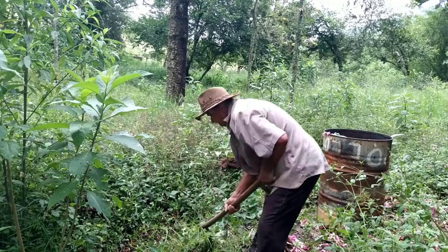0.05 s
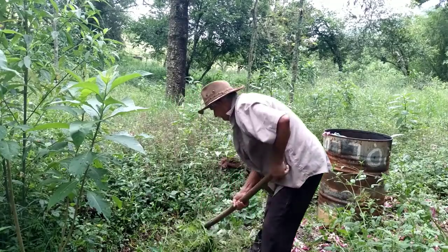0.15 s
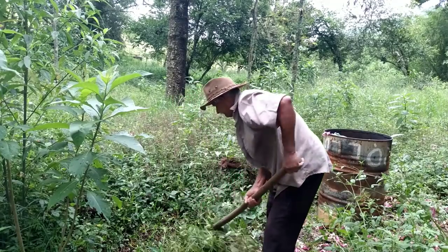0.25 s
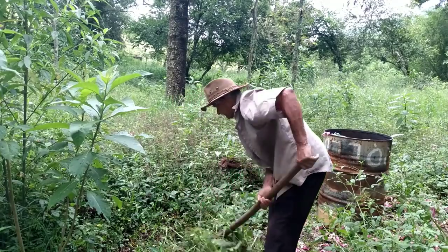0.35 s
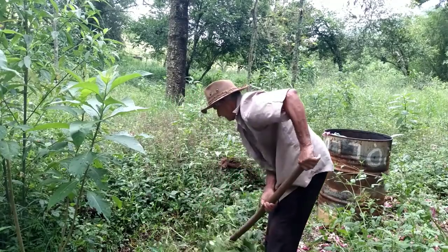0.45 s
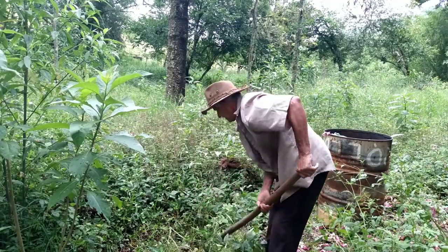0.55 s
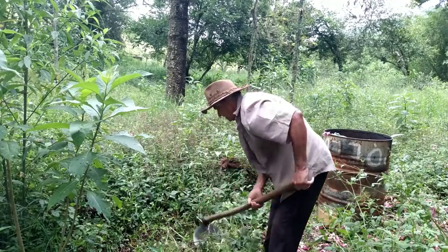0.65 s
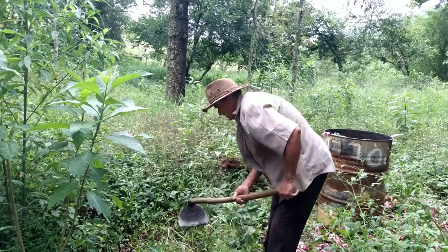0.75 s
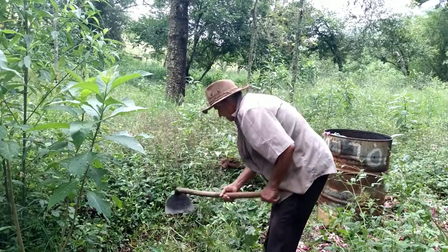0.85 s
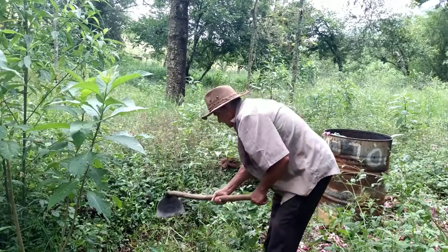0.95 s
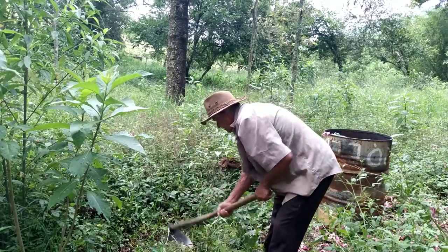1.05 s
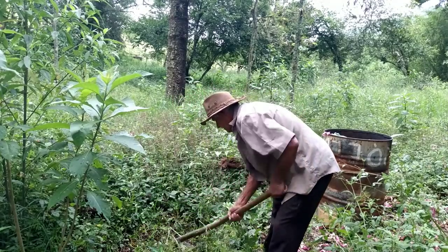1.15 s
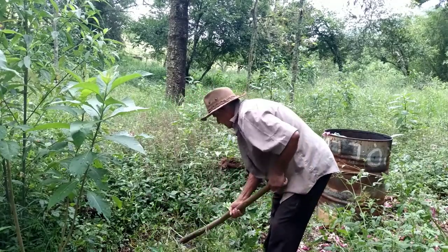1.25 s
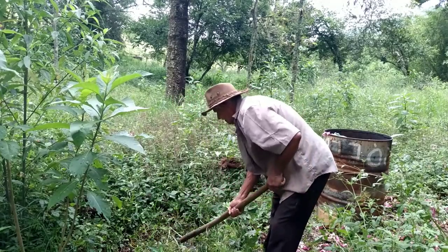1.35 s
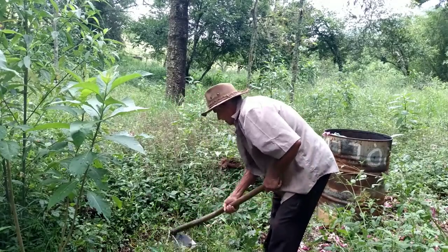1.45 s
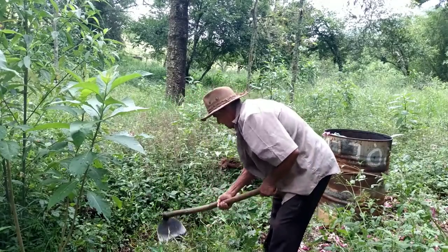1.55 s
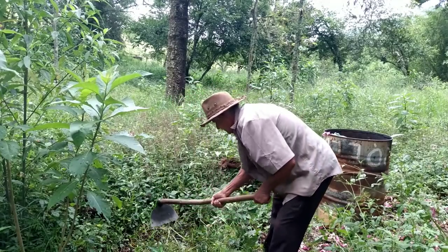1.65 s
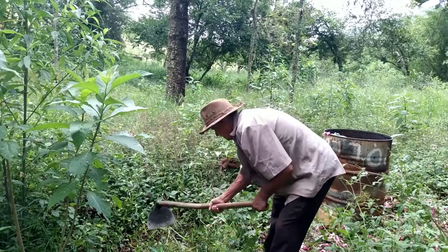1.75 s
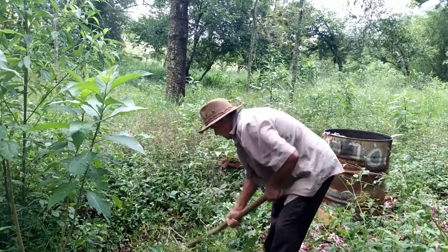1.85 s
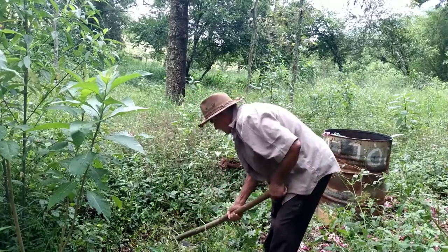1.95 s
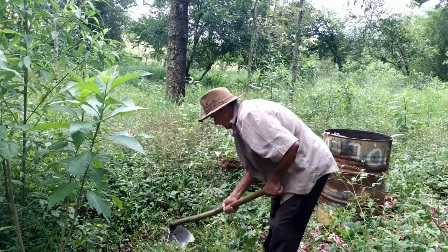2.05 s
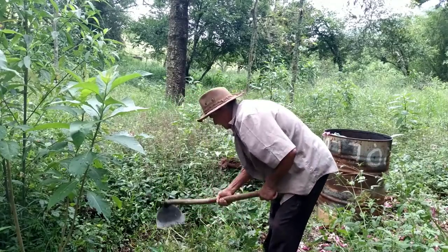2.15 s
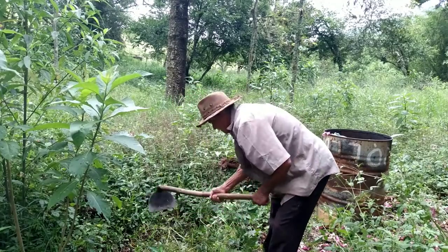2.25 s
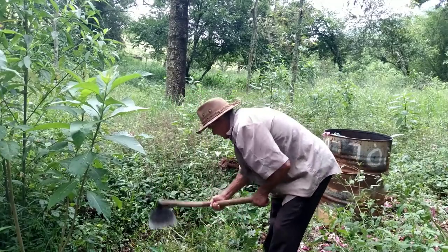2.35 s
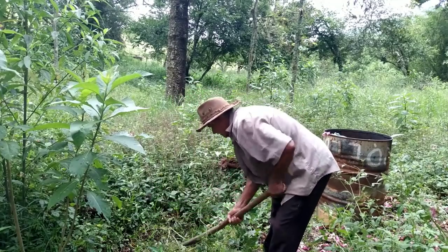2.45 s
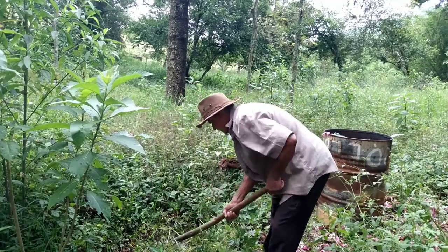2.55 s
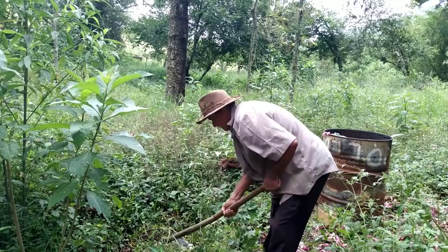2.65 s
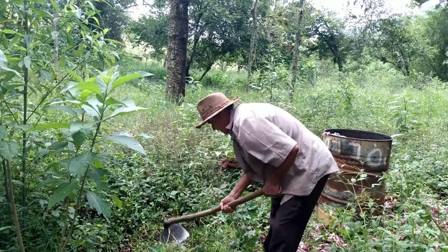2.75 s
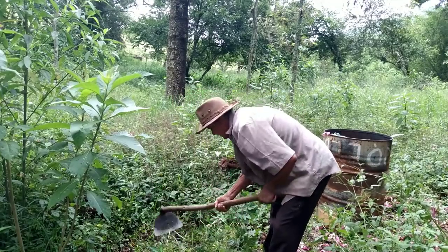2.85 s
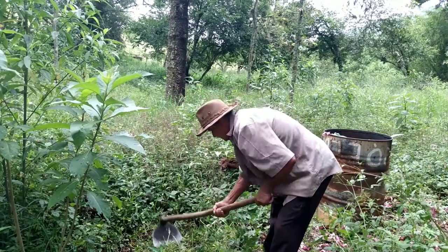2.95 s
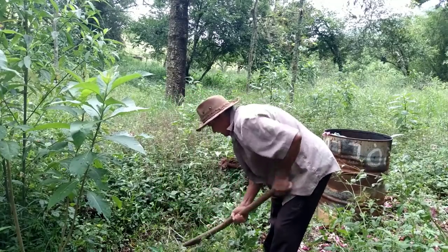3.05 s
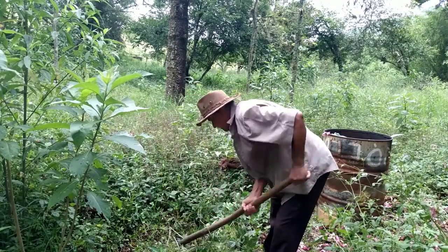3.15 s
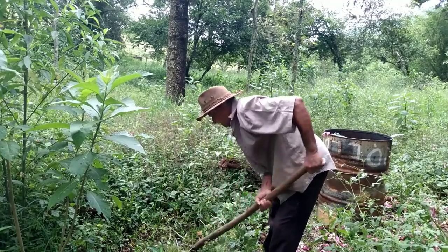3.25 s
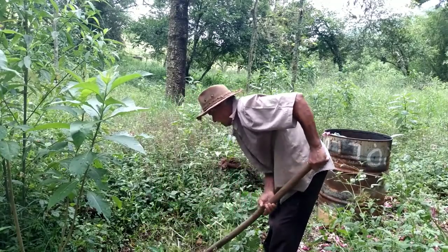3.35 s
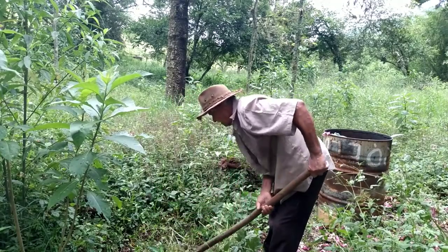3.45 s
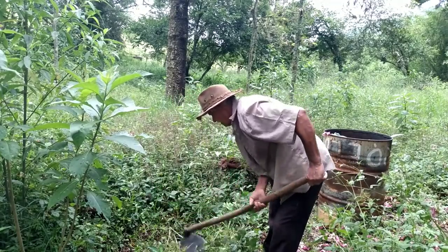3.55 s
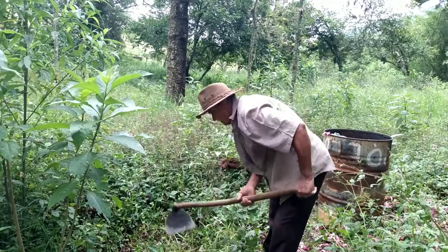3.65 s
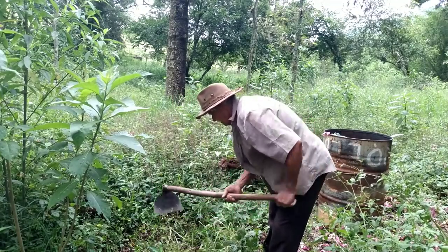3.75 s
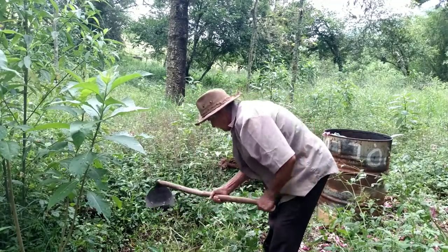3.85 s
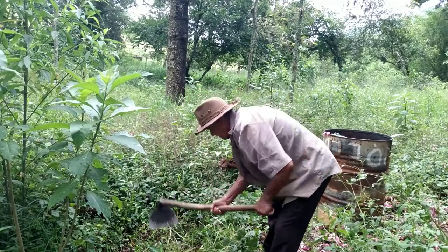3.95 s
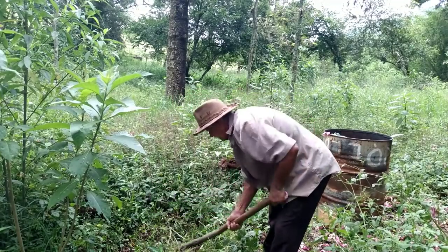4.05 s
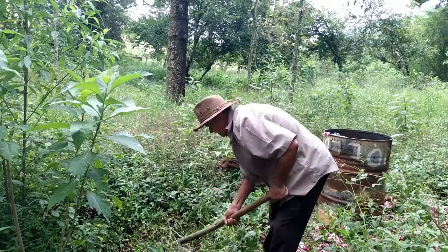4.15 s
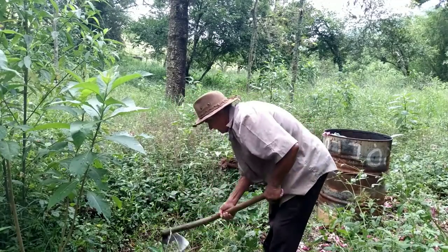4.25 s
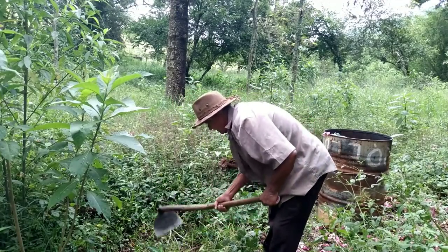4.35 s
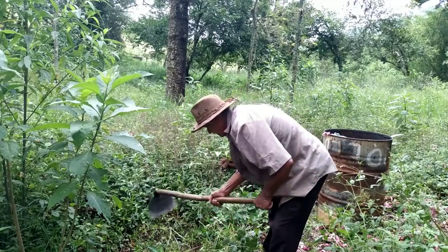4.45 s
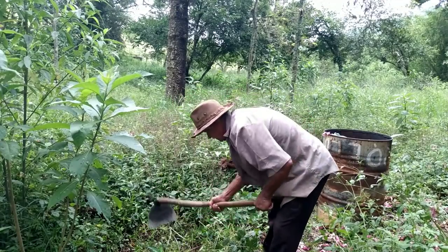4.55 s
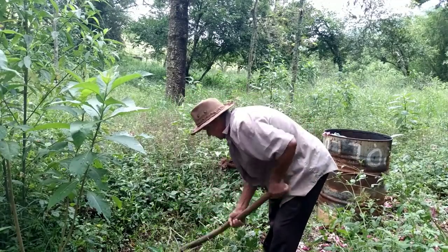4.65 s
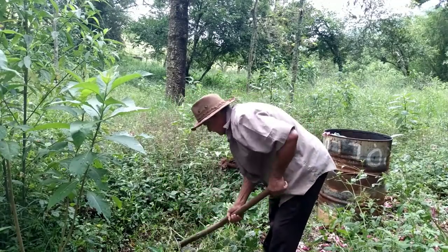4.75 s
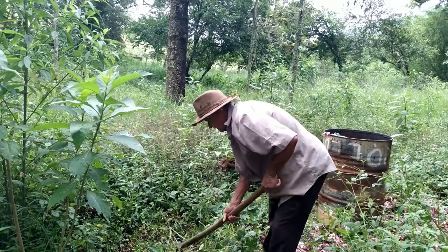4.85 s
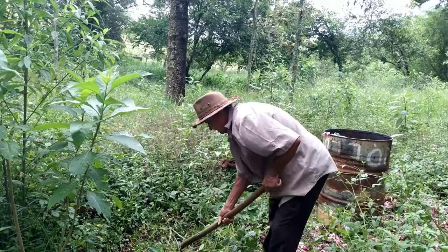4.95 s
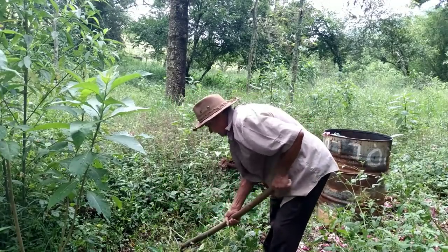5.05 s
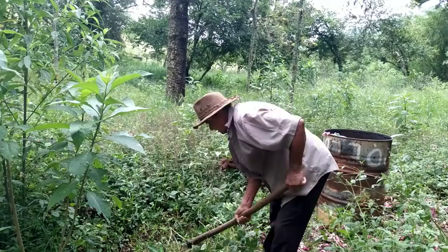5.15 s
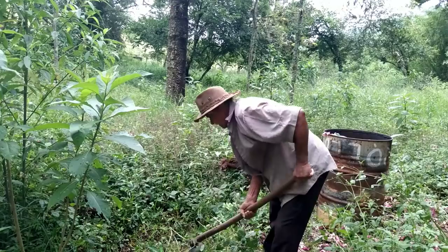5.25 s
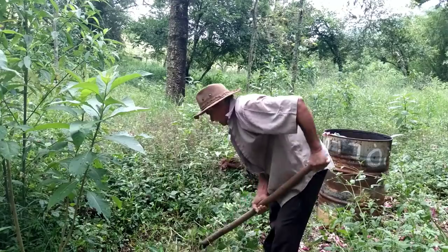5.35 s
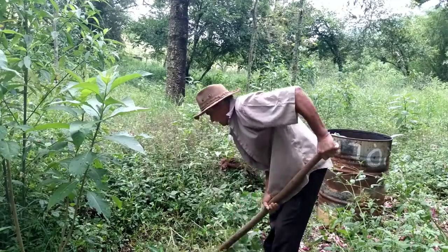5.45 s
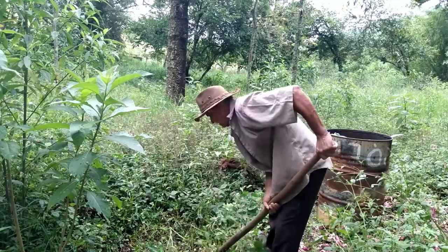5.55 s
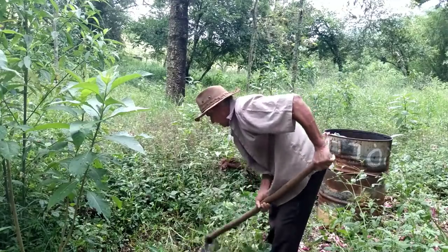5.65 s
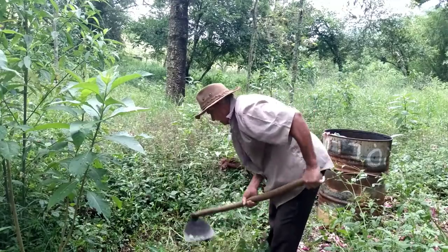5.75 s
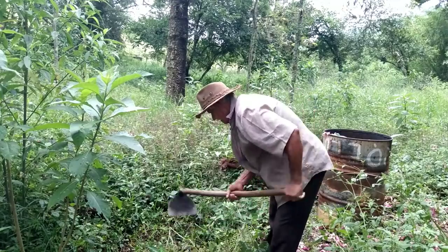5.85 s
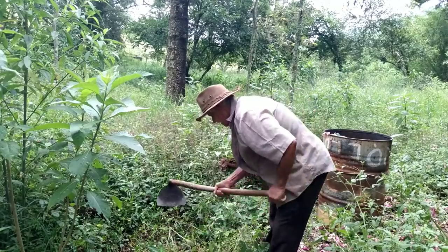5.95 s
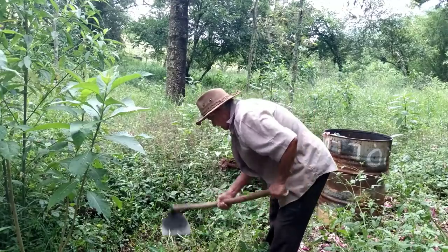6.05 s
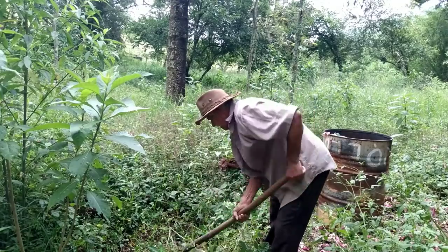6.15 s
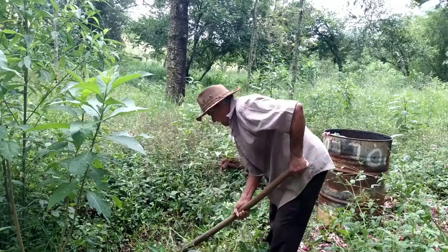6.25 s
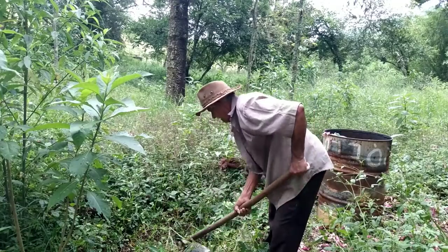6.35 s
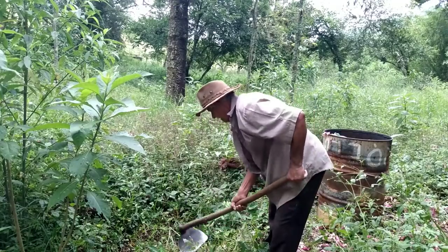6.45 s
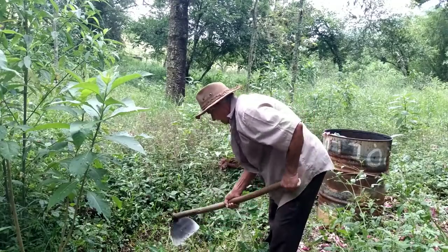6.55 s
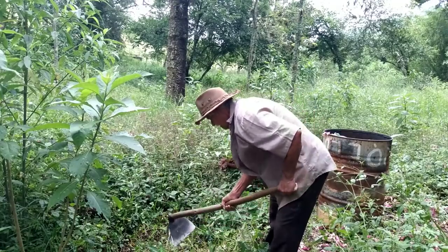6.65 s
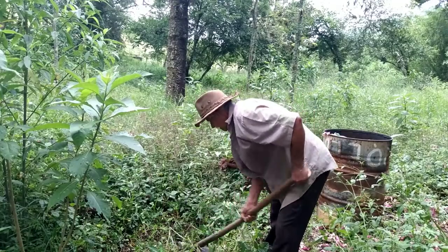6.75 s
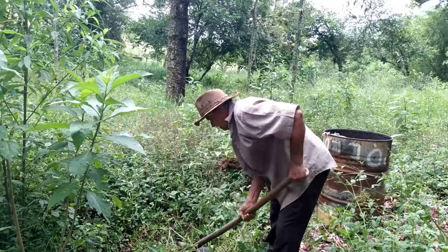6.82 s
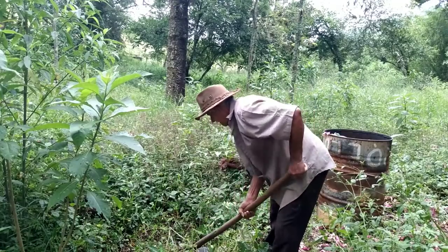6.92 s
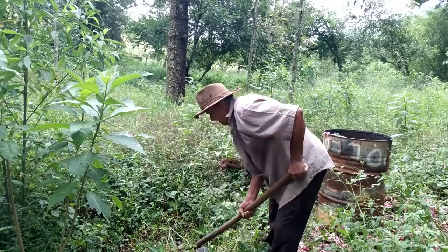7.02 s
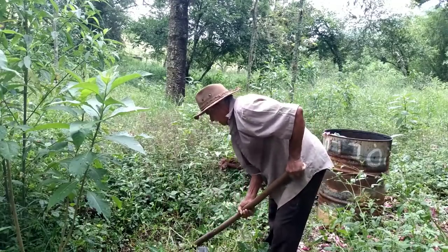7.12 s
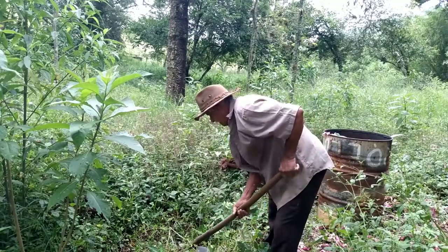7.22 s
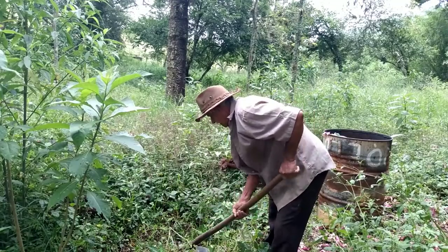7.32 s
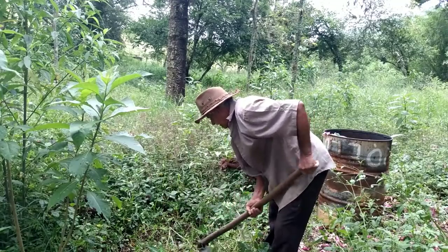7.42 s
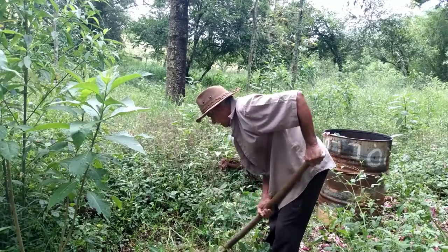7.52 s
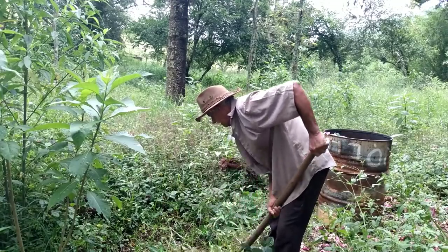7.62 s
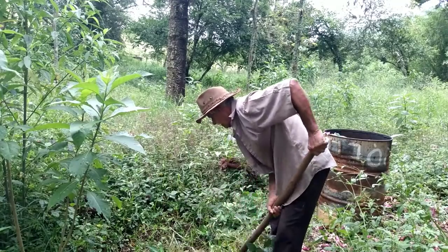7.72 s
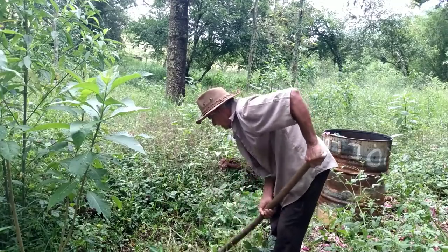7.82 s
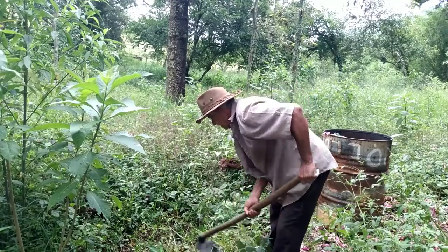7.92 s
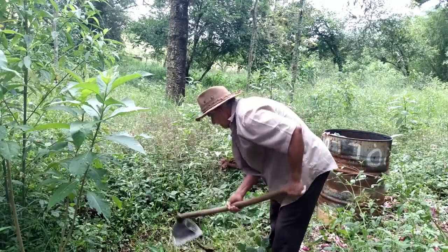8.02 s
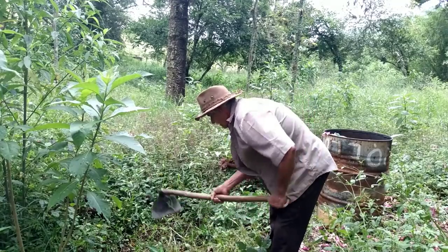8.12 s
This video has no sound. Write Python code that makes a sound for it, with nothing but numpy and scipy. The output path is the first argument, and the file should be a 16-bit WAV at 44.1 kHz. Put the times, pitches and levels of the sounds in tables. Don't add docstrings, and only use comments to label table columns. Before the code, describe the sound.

A steel hoe works weedy soil in open woodland, heard in stereo from a few metres with almost no echo. At 0 s the blade is already dragging, with rustling leaves, small snaps and gritty soil until about 0.7. A clean, clipped chop lands at 1.1, a more ringing, bouncing one at 1.9, another at 2.5, then a weak, slow one at 3.1 with snapping stems and a leafy pull. Firm chops follow at 4.1 and 4.7, the latter stopping abruptly, then crackling raking from 5.0 to 5.7. The hardest, loudest blows hit at 6.15 and 6.8, trailed by dry stalk ticks around 7. A softer scrape swells near 7.5 and fades, with light rustling to about 8.2. Throughout, insects hiss thinly in high bands above a low woodland murmur and slight wind; very faint bird whistles, some falling, some level, appear near 0.7, 1, 1.5, 2.1, 2.3, 3.6 and 5.7.

```python
import sys
import numpy as np
from scipy import signal
from scipy.fft import rfft, irfft, next_fast_len
from scipy.io import wavfile
from scipy.ndimage import uniform_filter1d, map_coordinates

SR = 44100
rng = np.random.default_rng(int(sys.argv[2]) if len(sys.argv) > 2 else 0)


def convert_level_to_amplitude(level_db):
    exponent = np.asarray(level_db, float) / 20
    return 10 ** exponent


def materialize(psi):
    bounded = np.clip(np.atleast_2d(psi).T, -1, 1)
    quanta = np.round(bounded * 32767).astype(np.int16)
    wavfile.write(sys.argv[1], SR, quanta)


N = 360738

# frequency in Hz, density in dB per Hz.
MURMUR_COLOUR = [(47, -35), (80, -6.5), (156, -9.5), (195, -7), (250, -4.5), (330, -11.5), (520, -11),
                 (700, -18.5), (990, -26.5), (2750, -22.5), (3850, -24), (4400, -18), (5720, -42.5),
                 (9680, -120)]
# frequency in Hz, density in dB per Hz.
HAZE_COLOUR = [(3650, -33), (6200, -4), (8340, -7), (9470, -13.5), (10500, -7), (11400, -11),
               (15100, -13.5), (16000, -14)]
# frequency in Hz, density in dB per Hz.
WIND_COLOUR = [(4, -1), (10, -2.5), (25, -10.5), (60, -19), (130, -28.5), (250, -50)]
# time in seconds, level in dB.
WIND_STRENGTH = [(0, -56.5), (.52, -60.5), (.93, -60), (1.5, -58.5), (1.96, -59.5), (3.6, -59), (4.76, -57),
                 (5.76, -59.5), (6.17, -60.5), (6.92, -59), (7.2, -58.5), (8.18, -60)]
# time in seconds, low kind in dB, high kind in dB.
INSECT_LEVELS = [(0, -57, -60), (1.05, -63, -55), (1.5, -60, -60), (2.85, -61, -56), (4.502, -62, -57.5),
                 (5, -58.5, -59), (6.65, -60, -59), (8.18, -60, -57)]
# centre in Hz, width in Hz.
INSECT_BANDS = [
    (4810, 400),
    (5740, 800),
]
# frequency in Hz, left-right correlation from -1 to 1.
FAR_LIKENESS = [(60, 0.83), (180, 0.21), (550, 0.68), (1650, -0.29), (4970, -0.047), (15000, -0.13)]
# frequency in Hz, left minus right in dB.
FAR_LEAN = [(60, -10), (130, 1.5), (290, 1), (640, -1), (1410, 0.5), (3100, -1.5), (6820, 8), (15000, -8.5)]
# frequency in Hz, left-right correlation from -1 to 1.
NEAR_LIKENESS = [(60, 0.36), (180, 1), (550, 0.9), (1650, 0.46), (4970, 0.74), (15000, 0.1)]
# frequency in Hz, left minus right in dB.
NEAR_LEAN = [(100, 2), (300, -1.5), (800, 1), (2000, 0.5), (3500, 3.5), (5200, 2), (7000, 19), (8300, 11.5),
             (10000, -19), (15000, -2)]
# frequency in Hz, density in dB per Hz.
SOIL_COLOUR = [(59, -35.5), (100, -8.5), (203, -1.5), (370, -6), (551, -3.5), (1300, -6.5), (1690, -43.5),
               (2860, -120)]
# frequency in Hz, density in dB per Hz.
STEM_COLOUR = [(650, -38.5), (1100, -20), (1390, -13), (1640, -5.5), (2250, -8.5), (2610, -5.5),
               (6500, -11), (8450, -43.5), (14300, -120)]
# frequency in Hz, density in dB per Hz.
LEAF_COLOUR = [(3710, -37), (6300, -7.5), (7480, 1.5), (8630, -9), (10400, -8), (12300, -15), (15100, -31),
               (16000, -33)]
# frequency in Hz, density in dB per Hz.
EDGE_COLOUR = [(880, -29.5), (1500, -4), (2360, -9), (2740, -2), (4770, -5), (7090, -10.5), (8150, -8.5),
               (15400, -37), (16000, -46.5)]
# strongest moment in seconds, level in dB,
# swelling t60 in seconds, fading t60 in seconds, leafiness in dB.
PULLS = [(.05, -46, 0.59, 2.6, -6), (.32, -41, 1.9, 0.95, 1), (.6, -52, 1.3, 0.95, -0.5),
         (1.24, -53, 0.61, 1.14, 1), (1.985, -43.5, 0.14, 0.54, -5), (2.16, -65, 1, 0.8, 2),
         (2.69, -52, 0.9, 0.43, -6.5), (3.27, -41, 1.75, 0.68, 2.5), (3.1, -43, .3, 0.5, -3),
         (3.18, -42, 1, 1.2, -2.5), (3.56, -51.5, 1.26, 0.28, 3), (4.28, -52, 1.3, 0.3, -8.5),
         (4.869, -50.5, 0.14, 0.16, -11.5), (5.107, -43, 0.059, 0.18, -12), (5.06, -48.5, 0.26, 1.7, -2),
         (5.17, -39, 0.44, 0.67, -2), (5.355, -38.5, 0.72, 1.03, 1), (5.7, -57.5, 1.1, 0.79, 2),
         (6.32, -50, 0.52, 1.08, -3), (6.56, -63.5, 1.5, 1, 1), (7.045, -55, 1.4, 0.33, 3),
         (7.227, -57, 0.66, 0.57, -6.5), (7.45, -45.5, 0.3, 1.14, -2.5), (7.6, -41, 1.98, 0.67, -0.5),
         (7.963, -48.5, 1.6, 1.05, -0.5)]
# level in dB, t60 in seconds, leafiness in dB.
SPRAYS_OF_SOIL = [(-39, 0.39, -5.5), (-32.5, 0.27, -5), (-37.5, 0.544, -3), (-38, 0.29, -5),
                  (-38, 0.6, -4.5), (-44.5, 0.69, -4.5), (-33.5, 0.47, -1.5), (-36.5, 0.47, -4)]
# start in seconds, peak in dB, pitch in Hz, low knock in relative dB.
STEM_SNAPS = [(0.018, -38, 2750, -17), (0.0532, -35, 2100, -18), (1.9518, -27, 1610, -28),
              (1.981, -26, 1610, -6), (2.5185, -24, 1620, 0), (2.693, -44, 4270, -14),
              (3.042, -38.5, 7070, -14), (3.073, -30.5, 3280, 7), (3.0911, -21, 1920, -1),
              (4.1255, -27.5, 2230, -15.5), (4.738, -30, 3640, 0), (4.8682, -42.5, 5640, -10),
              (5.1051, -24, 4850, -28), (5.139, -39.5, 2220, 7), (5.1727, -28.5, 1900, 2),
              (5.3328, -28.5, 6600, -5), (5.357, -24.5, 2200, -5), (5.4036, -27.5, 4460, -8),
              (6.1998, -31.5, 1640, -3), (6.235, -26, 1600, -4.5), (6.3459, -41, 1770, -2),
              (6.8158, -15, 4430, -41), (6.89, -35, 7070, -26.5), (6.946, -31, 7000, -8),
              (7.016, -39, 7100, -2), (7.031, -35.5, 4100, -26), (7.0366, -36.5, 4120, -3),
              (7.181, -43, 2410, -5.5), (7.234, -36.5, 2420, -29), (7.447, -30, 3240, 0),
              (5.2564, -30, 1510, -1)]
# start in seconds, frequency in Hz, level in dB, t60 in seconds.
BLADE_RINGS = [(.03, 860, -41, 0.28), (0.022, 1220, -42, 0.12), (1.984, 1640, -46, .12),
               (1.992, 2920, -43.5, .25), (1.99, 3480, -45, .27), (1.985, 5850, -50, 0.24),
               (1.985, 6780, -42, .2), (7.174, 2450, -49, .05), (7.214, 2450, -53, .04),
               (7.23, 2420, -48, .06), (5.03, 860, -50, .3), (5.339, 1290, -44, .4), (7.632, 520, -48, .06),
               (7.71, 300, -48, .08), (7.42, 860, -47, .3), (7.447, 1120, -39, 0.097),
               (8.08, 860, -48, 0.12), (8.081, 1290, -52, 0.29)]
# start in
# seconds, frequency in Hz, level in dB, swelling in ms.
BLADE_KNOCKS = [(0.0416, 1215, -42, 5.7), (0.048, 874, -41, 6.5), (0.0492, 2060, -40, 4.8),
                (0.0504, 1510, -36, 3.1), (1.9339, 1636, -45, 3.3), (1.9497, 1610, -33, 4),
                (1.9519, 543, -31, 2.1), (1.9791, 1606, -29.5, 5.9), (1.9832, 2100, -34, 3.8),
                (2.4986, 401, -43, 7.2), (2.5108, 3150, -43, 7.0), (2.5147, 269, -33, 1.3),
                (2.5179, 800, -29, 1.2), (3.1024, 1000, -42, 6.3), (3.2245, 2590, -35.6, 1.4),
                (3.2611, 1810, -43, 2.7), (4.1086, 2150, -40.5, 7.0), (4.1125, 2400, -43, 3.2),
                (4.1149, 2820, -43, 1.8), (4.1156, 3430, -39.5, 4.6), (4.7229, 2240, -42, 6.8),
                (4.7316, 845, -37, 7.5), (4.7366, 1948, -43.5, 2.3), (5.103, 1022, -37, 3.4),
                (5.1035, 2930, -34, 1.4), (5.1059, 2360, -32, 1.1), (5.1715, 794, -42, 1.2),
                (5.3519, 2580, -39, 5.2), (5.354, 3320, -37, 1.3), (5.3544, 1710, -30, 1.9),
                (5.3559, 486, -35.5, 1.8), (6.1807, 690, -34, 1.28), (6.1811, 1780, -34, 7.0),
                (6.1957, 820, -30, 6.5), (6.2026, 1610, -32.5, 3.3), (6.8265, 2550, -40, 1.6),
                (7.4465, 860, -35.5, 7.3), (7.4466, 3402, -43, 3.6), (7.6352, 538, -38.5, 2.6),
                (.02, 2680, -44, 7), (.036, 2380, -43, 3.7), (0.064, 3280, -45, 4.7),
                  (.078, 650, -43, 3.4), (1.921, 557, -24, 2.7), (2.479, 1570, -17.5, 2.5),
                  (4.0714, 193, -13, 1.5), (1.138, 395, -42, 1.5), (6.16, 227, -25, 2.5),
                  (6.79, 846, -10, 1.8), (6.797, 173.4, -14, 5.9), (6.799, 694, -14.5, 4.1),
                  (6.819, 180, -30.5, 4.3)]
# start in seconds, frequency in Hz, level in dB, swelling in ms.
JOLT_FLARES = [(1.1335, 519, -25, 6.2), (1.1362, 1580, -11, 2.4), (1.1372, 950, -15.5, 0.94),
               (1.1372, 1970, -29, 2.3), (1.1376, 270, -19.5, 2.7), (1.1393, 3680, -29, 4),
               (1.8975, 1240, -8.5, 1.3), (1.8982, 1600, -2.5, 1.4), (1.9018, 187, -17, 8.3),
               (1.9022, 890, -19.5, 4.3), (1.9056, 570, -8.5, 2.2), (1.9175, 1576, -11.5, 2.2),
               (2.4685, 525, -15, 8), (2.4702, 1545, -9.5, 4.2), (2.4718, 2600, -8, 0.77),
               (2.4727, 750, -10, 2), (2.473, 2032, -14.5, 3.8), (2.4862, 187.7, -18, 1.7),
               (3.0889, 302, -30.5, 2.9), (3.09, 1840, -28, 1.6), (3.0901, 5130, -26, 2.5),
               (3.0907, 3400, -28, 3.1), (3.0911, 582, -26.5, 3.5), (3.0941, 1000, -35, 4.7),
               (4.0698, 2226, -12, 3.9), (4.071, 1002, -13.5, 2), (4.0714, 1528, -5, 2.9),
               (4.0721, 3560, -14, 2.3), (4.0734, 752, -12.5, 1.5), (4.075, 520, -8.5, 2.8),
               (4.6851, 538, -17, 6.6), (4.6857, 2290, -11, 1.14), (4.6861, 1512, -16.5, 2.5),
               (4.6867, 1125, -11, 1.4), (4.6881, 736, -12.5, 1.8), (4.6882, 153, -11.5, 1.4),
               (6.1484, 1990, -14, 3.3), (6.1508, 7290, -11.5, 1.5), (6.1509, 1543, -7.5, 2.1),
               (6.1511, 837, -8, 3.6), (6.1515, 2800, -7, 1.7), (6.152, 211.8, -3.5, 3),
               (6.7838, 236, -9.5, 3.3), (6.7895, 7080, -13.5, 2.2), (6.7899, 2906, -14.5, 2.3),
               (6.7902, 3500, -8, 1.3), (6.7909, 709, -6, 2.2), (6.7912, 1186, -13.5, 1.5)]
# start in seconds, frequency in Hz, level in dB.
STALK_TICKS = [(3.0431, 7019, -39), (3.0495, 4823, -41.5), (3.0703, 3220, -29), (3.0733, 3330, -38),
               (3.083, 3300, -22), (3.0904, 3337, -28.7), (3.09, 5230, -34), (3.093, 6621, -38),
               (3.0954, 6696, -38), (3.108, 6840, -29), (5.1039, 4570, -24.5), (5.106, 7633, -38),
               (5.1763, 3186, -39), (5.1854, 6244, -32), (5.1857, 2700, -32), (5.331, 2660, -42),
               (5.3301, 6750, -38), (5.356, 5813, -23.5), (5.3546, 3348, -35), (5.378, 5830, -37.7),
               (5.4049, 6800, -39), (5.4059, 4370, -36.5), (6.8907, 3560, -37), (6.8943, 7127, -42),
               (6.9441, 4200, -34), (6.9475, 10300, -38), (6.953, 5717, -44.5), (6.9513, 7340, -48.5),
               (7.0147, 7300, -37), (7.0152, 4100, -34), (7.0136, 2760, -40), (7.0315, 4260, -33.5),
               (7.0382, 4250, -31), (7.039, 7270, -37), (0.2733, 2840, -38), (0.2845, 4844, -34),
               (0.3194, 2723, -41), (0.3392, 4760, -40.5), (7.447, 3300, -44), (7.4912, 4295, -31),
               (7.5509, 3445, -34), (1.24, 2500, -46), (6.8172, 3700, -24), (6.35, 3050, -46),
               (1.93, 2700, -29), (1.9392, 3640, -37), (2.509, 3850, -27.5), (2.5145, 3111, -39),
               (6.179, 2900, -35.5), (6.193, 7450, -29)]
# start in seconds, length in seconds, start in Hz, end in Hz, level in dB.
WHISTLES = [
    (0.963, 0.14, 4400, 3640, -69),
    (1.515, 0.075, 4250, 3280, -65.5),
    (2.27, 0.165, 4760, 3350, -64.5),
    (0.685, 0.13, 2227, 2227, -64),
    (2.086, 0.13, 2230, 2230, -64),
    (3.592, 0.13, 2230, 2225, -66),
    (5.7, 0.165, 2225, 2230, -66),
]
# time in seconds, edge peak in dB, body in relative dB, stopping time (40 dB
# down) in seconds, rebound in dB.
BLOWS = [
    (1.1384, -3, 1, 0.028, -35),
    (1.899, -1.5, 10, 0.046, -8),
    (2.4716, -1.5, 7.5, 0.045, -12.5),
    (3.0648, -20, 4.5, 0.075, -7),
    (4.072, 1.5, 2.5, 0.031, -23),
    (4.687, 3, -0.5, 0.013, -26),
    (6.1508, 5.5, 1.5, 0.023, -17),
    (6.79, 7.5, 4.5, 0.017, -44),
]
# blade enters leaves in seconds, swish in dB,
# ground thud in dB, clod in dB.
LEAF_ENTRIES = [(1.124, -31, -27.5, -24.5), (1.887, -28, -22.5, -29.5), (2.465, -24.5, -27.5, -19),
                (3.037, -44.5, -31, -30), (4.06, -21.5, -24, -15.5), (4.667, -27, -16.5, -14.5),
                (6.141, -20.5, -21.5, -18.5), (6.77, -30.5, -17.5, -37)]
LANDING_TILTS = [-2.5, -1, 1, 2, 3.5, -3, 5, -2]
# frequency in Hz, width in Hz, level in dB.
HOE_MODES = [(210, 24, -7.5), (324, 150, -11), (538, 40, -4.5), (790, 61, -4.5), (837, 81, -3.5),
             (1080, 60, -3.5), (1178, 77, -9), (1555, 63, -16.5), (1980, 27, -12.5), (2200, 25, -17),
             (2580, 100, -12), (2633, 48, -14.5)]
# start in seconds, level in dB, pitch in Hz.
CLOD_DROPS = [(4.858, -34, 170), (4.735, -38, 130), (5.103, -38, 150), (5.17, -39, 250), (3.09, -38, 140),
              (5.35, -39, 110), (6.93, -44, 200), (7.7, -44, 200)]
# frequency in Hz, t60 in seconds.
WOOD_T60 = [(150, 0.049), (1500, 0.036), (8000, 0.047)]

MURMUR_DB, HAZE_DB = -57, -56
SPRAY_AFTER_S, SPRAY_RISE_S = 0.03, 0.043
BRUSH_DB, BRUSH_EARLY_S, BRUSH_RISE_S, BRUSH_FALL_S = -48.5, 0.0042, 0.07, 0.3
SOIL_DB, LEAVES_DB, STILL_DB = -7.5, -3, -76.5
SOIL_GROWS, LEAVES_GROWS = 1.31, 0.78
GRIP_DB, LET_GO_DB, STEEPER = 4.5, 24, 6
GRIT_PER_S, GRIT_DB, GRIT_HZ, GRIT_OCTAVES, GRIT_CYCLES = 900, -8, 3200, 0.9, 4
FLARE_DB, KNOCK_DB, TICK_DB = -1, -1, -4
TICK_MS, TICK_CRACK_DB = 0.83, -9.5
BITE_S = 0.0009
STIFLE = 1.21
REBOUND_S, JOLT_DB = 0.016, -12
DAMPING = 0.024
THUMP_T60_S = 0.04


def unit(x):
    return x / np.sqrt(np.mean(x ** 2) + 1e-20)


def along(points, hz):
    f, v = np.transpose(points)
    return np.interp(np.log(hz + 1), np.log(f + 1), v)


def coloured(points):
    return lambda hz: convert_level_to_amplitude(along(points, hz))


def bell(centre_hz, half_width_hz, order):
    return lambda hz: 1 / (1 + ((hz - centre_hz) / half_width_hz) ** order)


def decay(t, t60):
    return convert_level_to_amplitude(-60 * t / t60)


def onset(t, rise_s):
    return 1 - np.exp(-t / rise_s)


def sine(hz, t):
    return np.sin(2 * np.pi * hz * t)


def curves(rows):
    s, *cols = np.transpose(rows)
    return [np.interp(np.arange(N) / SR, s, c) for c in cols]


def wobble(rate):
    knots = rng.standard_normal(int(N * rate / SR) + 4)
    return map_coordinates(knots, [np.arange(N) * rate / SR])


def filtered(x, response):
    m = next_fast_len(x.shape[-1] + 8192)
    spectrum = rfft(x, m) * response(np.fft.rfftfreq(m, 1 / SR))
    return irfft(spectrum, m)[..., :x.shape[-1]]


def burst(size, response):
    return unit(filtered(rng.standard_normal(size), response))


def leaning(side, hz):
    return convert_level_to_amplitude(np.outer([.5, -.5], along(side, hz)))


def rush(gain, alike, side, grit_db=0, patchy_db=0):
    pair = rng.standard_normal((2, N)) * convert_level_to_amplitude(grit_db * wobble(1800))
    if patchy_db:
        z = signal.stft(pair, nperseg=256)[2]
        field = uniform_filter1d(rng.standard_normal(z.shape[1:]), size=5, axis=0)
        field = uniform_filter1d(field, size=8, axis=1)
        pair = signal.istft(z * convert_level_to_amplitude(patchy_db * unit(field)), nperseg=256)[1][:, :N]
    m = next_fast_len(N)
    hz = np.fft.rfftfreq(m, 1 / SR)
    turn = np.arccos(np.clip(along(alike, hz), -1, 1)) / 2
    shared, opposed = rfft(pair, m) * gain(hz) * [np.cos(turn), np.sin(turn)]
    ports = np.array([shared + opposed, shared - opposed])
    return unit(irfft(ports * leaning(side, hz), m)[:, :N])


def add(track, s, sound):
    part = track[round(s * SR):][:len(sound)]
    part += sound[:len(part)]


def air():
    murmur = convert_level_to_amplitude(MURMUR_DB) * rush(coloured(MURMUR_COLOUR), FAR_LIKENESS, FAR_LEAN)
    haze = convert_level_to_amplitude(HAZE_DB) * rush(coloured(HAZE_COLOUR), FAR_LIKENESS, FAR_LEAN, patchy_db=3.5)
    wind = rush(coloured(WIND_COLOUR), [(30, 0.036)], [(30, 0.0044)])
    gusts = convert_level_to_amplitude(curves(WIND_STRENGTH)[0] + 12.5 + 1.3 * wobble(2.9))
    return murmur + haze + gusts * wind


def insects():
    out = 0
    for db, (centre_hz, width_hz) in zip(curves(INSECT_LEVELS), INSECT_BANDS):
        peak = bell(centre_hz, width_hz / 2, 2)
        band = rush(lambda hz: peak(hz) ** 1.4, FAR_LIKENESS, FAR_LEAN)
        pulse_db = 1.2 * wobble(19) + 0.47 * wobble(70) + 1.2 * wobble(3)
        out = out + convert_level_to_amplitude(db + 4.0 + pulse_db) * band
    return out


def grit():
    draw = rng.random((round(GRIT_PER_S * N / SR), 4))
    spread = 3.4 * (draw[:, 1:2] + draw[:, 3:] - 1) / np.sqrt(2)
    hz = np.clip(GRIT_HZ * 2 ** (GRIT_OCTAVES * spread), 1000, 9000)
    step = np.arange(256)
    u = step * hz / (SR * GRIT_CYCLES / 3)
    size = -np.log(1 - draw[:, 2:3]) * np.sqrt(hz / GRIT_HZ)
    grains = size * u * np.exp(-u) * sine(hz, step / SR)
    where = (draw[:, :1] * N).astype(int) + step
    return unit(np.bincount(where.ravel(), grains.ravel(), N + 256)[:N])


def rustle():
    sprays = [(blow[0] + SPRAY_AFTER_S, db, SPRAY_RISE_S, t60, leafy)
              for blow, (db, t60, leafy) in zip(BLOWS, SPRAYS_OF_SOIL)]
    brushes = [(entry[0] - BRUSH_EARLY_S, BRUSH_DB, BRUSH_RISE_S, BRUSH_FALL_S, -2) for entry in LEAF_ENTRIES]
    s, db, rise, fall, leafy = np.transpose(PULLS + sprays + brushes)[:, :, None]
    t = np.arange(0, N / SR + .01, .002)
    before_db = 60 * (s - t) / rise
    after_db = 60 * (t - s) / fall
    cut_db = STEEPER * np.maximum(before_db - GRIP_DB, 0) + STEEPER / 4 * np.maximum(after_db - LET_GO_DB, 0)
    force_db = db - np.maximum(before_db, after_db) - cut_db + 45
    soil_db = SOIL_GROWS * force_db + SOIL_DB - leafy
    leaves_db = LEAVES_GROWS * force_db + LEAVES_DB + leafy
    gains = []
    for share_db in (soil_db, force_db, leaves_db):
        power = np.sum(convert_level_to_amplitude(share_db - 45.0) ** 2, axis=0) + convert_level_to_amplitude(STILL_DB) ** 2
        gains.append(np.interp(np.arange(N) / SR, t, np.sqrt(power)))
    flutter = convert_level_to_amplitude(0.73 * wobble(40) + 0.25 * wobble(130))
    out = convert_level_to_amplitude(GRIT_DB) * gains[1] * grit() * convert_level_to_amplitude([[1], [-1]])
    for gain, colour, grit_db in zip(gains, (SOIL_COLOUR, STEM_COLOUR, LEAF_COLOUR), (2.2, 3.2, 2.8)):
        layer = rush(coloured(colour), NEAR_LIKENESS, NEAR_LEAN, grit_db, patchy_db=0.45)
        out = out + gain * flutter * layer
    return out


def snaps():
    out, t = np.zeros(N), np.arange(SR // 12) / SR
    for s, db, pitch_hz, knock_db in STEM_SNAPS:
        crack = burst(len(t), coloured(EDGE_COLOUR))
        ping = convert_level_to_amplitude(-2.5) * burst(len(t), bell(pitch_hz, 150, 2))
        knock = convert_level_to_amplitude(knock_db) * burst(len(t), bell(800, 250, 4))
        tick = convert_level_to_amplitude(db - 13) * decay(t, .022) * burst(len(t), coloured(LEAF_COLOUR))
        shape = convert_level_to_amplitude(db - 8.0) * decay(t, 0.051) * onset(t, 0.0014)
        add(out, s, shape * (crack + ping + knock) + tick)
    return out


def contacts():
    out, t = np.zeros(N), np.arange(SR // 12) / SR
    blows = np.array([blow[0] for blow in BLOWS])
    for table, trim_db in ((JOLT_FLARES, FLARE_DB), (BLADE_KNOCKS, KNOCK_DB)):
        for s, hz, db, ms in table:
            u = t / (ms / 1000)
            swell = u * np.exp((1 - u ** STIFLE) / STIFLE)
            ahead = np.min(np.where(blows > s, blows - s, 1))
            bite = np.clip((t - ahead) / BITE_S + 1, 0, 1) if ahead < .008 else 1
            add(out, s, convert_level_to_amplitude(db + trim_db) * swell * bite * sine(hz, t))
    return out


def rings():
    out, t = np.zeros(N), np.arange(SR // 2) / SR
    for s, hz, db, t60 in BLADE_RINGS:
        add(out, s, convert_level_to_amplitude(db) * decay(t, t60) * sine(hz, t) * onset(t, 0.002))
    return out * convert_level_to_amplitude(2 * wobble(60))


def ticks():
    out, t = np.zeros(N), np.arange(SR // 12) / SR
    u = t / (TICK_MS / 1000)
    for s, hz, db in STALK_TICKS:
        noise = burst(len(t), lambda f: coloured(EDGE_COLOUR)(f) + coloured(LEAF_COLOUR)(f))
        add(out, s, convert_level_to_amplitude(db + TICK_DB) * u * np.exp(1 - u) * (sine(hz, t) + convert_level_to_amplitude(TICK_CRACK_DB) * noise))
    return out


def bird():
    out = np.zeros(N)
    for s, length, start_hz, end_hz, db in WHISTLES:
        u = np.arange(round(length * SR)) / (length * SR)
        pitch = end_hz + (start_hz - end_hz) * (1 - u) ** 2
        breath = np.sin(np.pi * u) ** 0.28 * convert_level_to_amplitude(1.0 + 0.89 * wobble(40)[:len(u)])
        add(out, s, convert_level_to_amplitude(db) * breath * np.sin(2 * np.pi * np.cumsum(pitch) / SR))
    return out


def struck(tilt_db):
    return [(hz, width, db + tilt_db * np.log2(hz / 700)) for hz, width, db in HOE_MODES]


def resonant(modes):
    def response(f):
        total = 0
        for k, (centre, width, db) in enumerate(modes):
            loss = 1j * f * (width + DAMPING * centre)
            total = total + (-1) ** k * convert_level_to_amplitude(db) * loss / (centre * centre - f * f + loss)
        return total
    return response


def chops():
    out, t = np.zeros(N), np.arange(SR // 4) / SR
    size, edge = len(t), coloured(EDGE_COLOUR)
    for blow, entry_row, tilt_db in zip(BLOWS, LEAF_ENTRIES, LANDING_TILTS):
        s, db, body_db, stop, rebound_db = blow
        entry, swish_db, thud_db, clod_db = entry_row
        rebound = (t > REBOUND_S) * convert_level_to_amplitude(rebound_db) * decay(np.abs(t - REBOUND_S), 0.01)
        force = convert_level_to_amplitude(-40 * (t / stop) ** 1.584) + rebound
        jolts = rng.standard_normal(size) * convert_level_to_amplitude(5.4 * rng.standard_normal(size)) * force
        jolts[0] += 1.4 * np.linalg.norm(jolts)
        body = resonant(struck(tilt_db))
        ring = filtered(jolts, lambda hz: body(hz) / (1 + 1j * hz / 4000))
        ring = ring / np.abs(ring).max()
        tearing = convert_level_to_amplitude(-7.5) * force ** 1.94 + convert_level_to_amplitude(-37.5) * decay(t, 0.19)
        crack = burst(size, edge) * tearing * onset(t, 0.0016)
        thud = convert_level_to_amplitude(thud_db) * decay(t, 0.13) * sine(76, t)
        clod = convert_level_to_amplitude(clod_db - 6.0 - 60 * (t / 0.05) ** 1.9) * burst(size, bell(210, 130, 4))
        hit = convert_level_to_amplitude(db) * (convert_level_to_amplitude(body_db + JOLT_DB) * ring + convert_level_to_amplitude(-4.5) * crack)
        add(out, s - .001, hit + (thud + clod) * onset(t, 0.0015))
        swell = onset(t, 0.0075) * decay(np.clip(t - (s - entry), 0, None), .12)
        swish = burst(size, edge) + 0.52 * burst(size, coloured(SOIL_COLOUR))
        add(out, entry, convert_level_to_amplitude(swish_db) * swell * swish)
    return out


def scatter(x):
    hz, t, z = signal.stft(rng.standard_normal((2, SR // 3)), SR, nperseg=256)
    fade = decay(t, along(WOOD_T60, hz)[:, None])
    bright = np.clip(hz / 1800, .04, 1)[:, None]
    tail = signal.istft(z * fade * bright, SR, nperseg=256)[1]
    return signal.fftconvolve(x[None], tail / np.linalg.norm(tail[0]), axes=1)[:, :N]


def thumps():
    out, t = np.zeros(N), np.arange(SR // 10) / SR
    for s, db, hz in CLOD_DROPS:
        add(out, s, convert_level_to_amplitude(db) * decay(t, THUMP_T60_S) * onset(t, 0.0008) * sine(hz, t))
    return out


def scene():
    hoe = snaps() + contacts() + rings() + ticks() + chops() + thumps()
    lag = lambda hz: np.exp(-1j * np.pi * np.outer([-1, 1], hz) * 4.5e-5)
    direct = filtered(np.array([hoe, hoe]), lambda hz: leaning(NEAR_LEAN, hz) * lag(hz))
    whistles = bird() * convert_level_to_amplitude([[1.5], [-1.5]])
    return air() + insects() + rustle() + whistles + direct + convert_level_to_amplitude(-2.0) * scatter(hoe)


def roll_off(x):
    return signal.sosfilt(signal.butter(12, 16120, fs=SR, output="sos"), x)


def record(dry):
    mix = filtered(np.clip(dry, -1, 1), lambda hz: 1 / (1 + (hz / 16500) ** 24))
    return roll_off(mix)


dry = scene()
out = record(dry)
materialize(out)
```